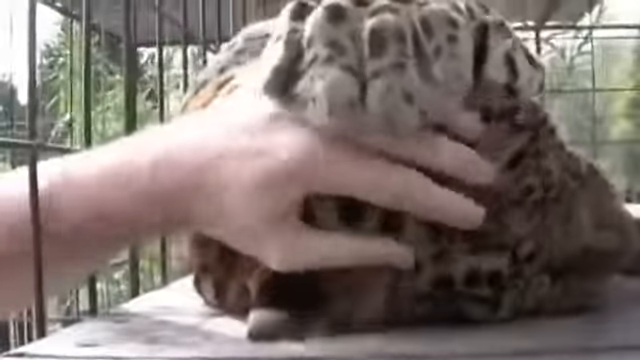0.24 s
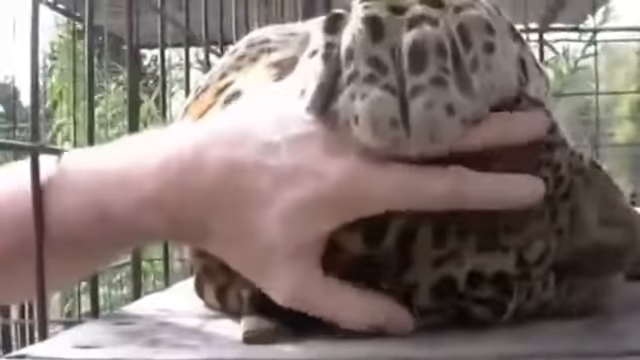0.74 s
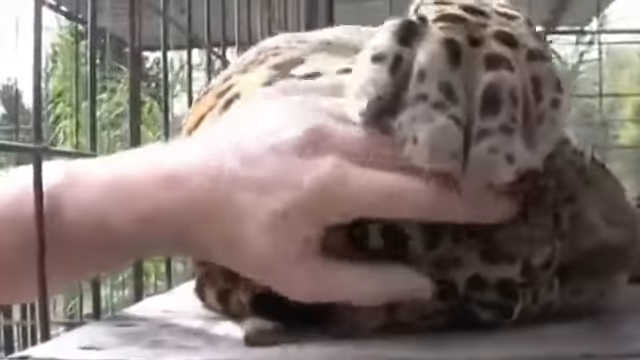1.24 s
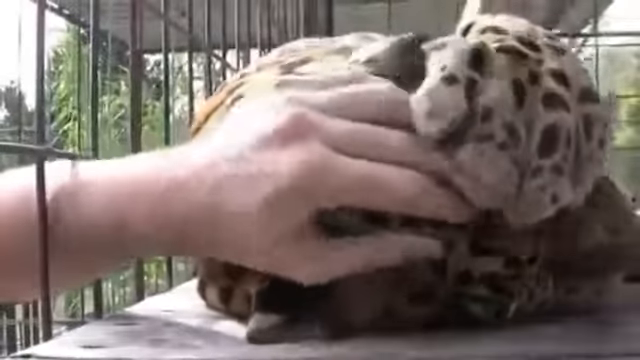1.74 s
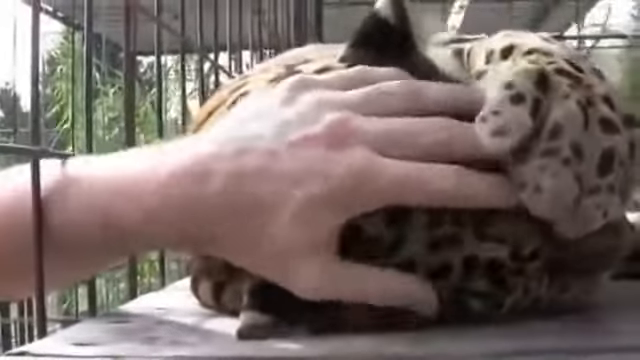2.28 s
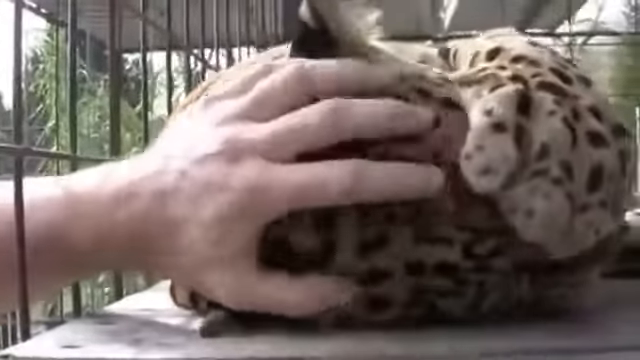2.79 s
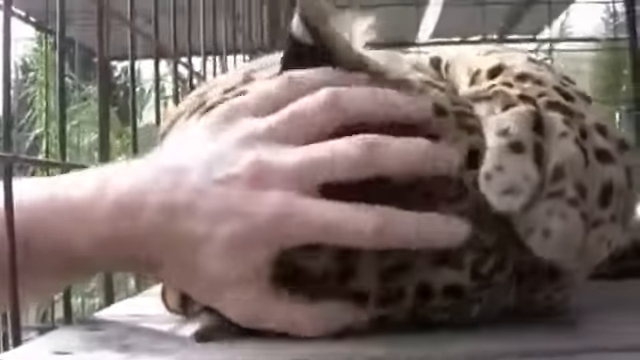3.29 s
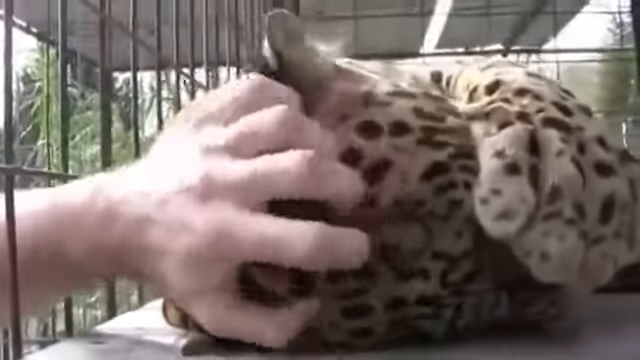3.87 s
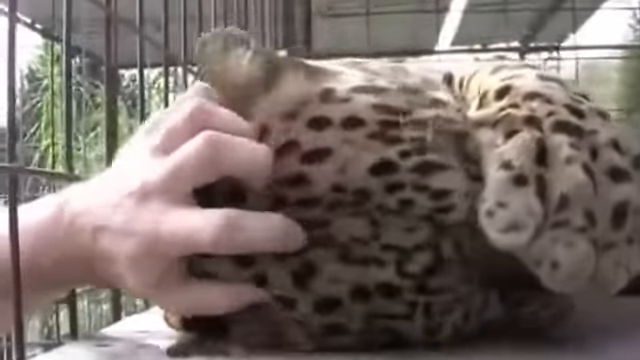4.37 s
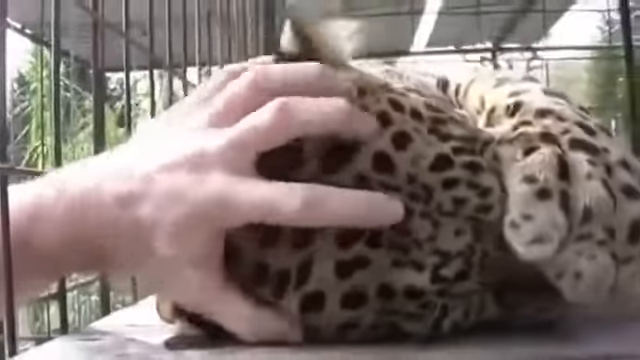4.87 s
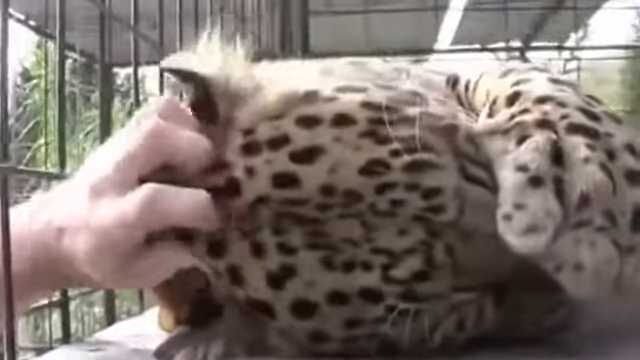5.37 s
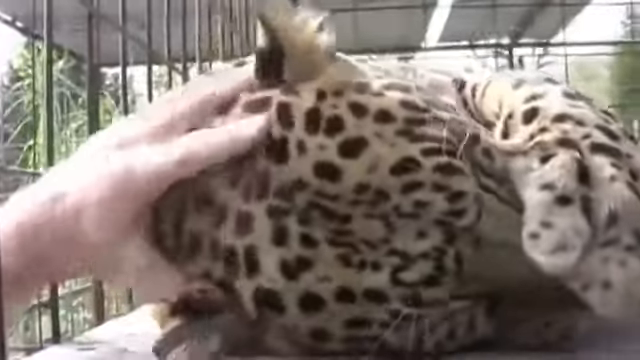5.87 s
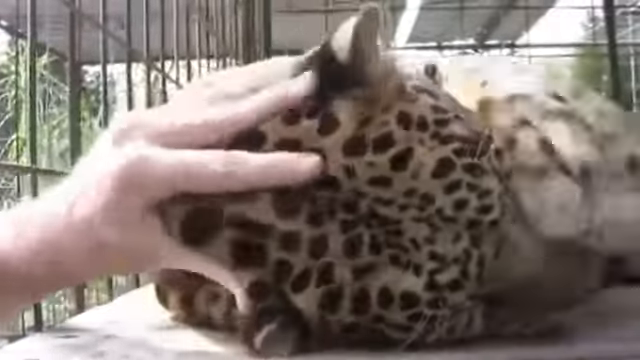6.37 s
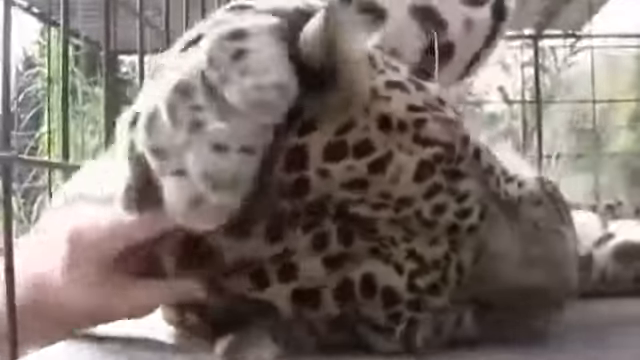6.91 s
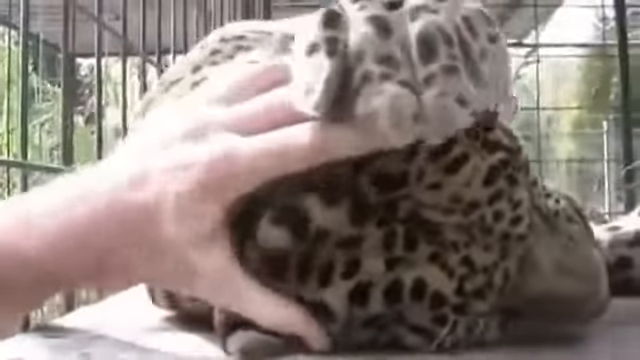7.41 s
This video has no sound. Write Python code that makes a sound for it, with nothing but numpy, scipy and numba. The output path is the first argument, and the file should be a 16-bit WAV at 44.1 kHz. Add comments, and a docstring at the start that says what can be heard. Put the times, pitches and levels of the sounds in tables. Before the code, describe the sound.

One long, loud, rumbling big-cat growl fills the whole stretch, dry and close, with only a short diffuse tail from an outdoor cage. Separate throat pulses are audible like a slow motor. It dulls after the first second, grows fuller from the middle, then becomes irregular and raspier. Faint hand-on-fur rustle, two tiny ticks, wind buffets and constant hiss sit behind, with clipped peaks.

```python
"""From start to end a big cat growls on one long breath, close to a stereo microphone, in an outdoor cage.
Its vocal folds slap shut about thirty times a second and rebound once, ringing throat and mouth.
The input hisses throughout and a breeze rumbles; from half a second to 4.3 s fingers rustle in fur.
Gusts brush the microphone ports between 0.5 and 2.6 s, and small ticks fall at 0.5 and 3.3 s.
After 5.3 s the folds limp in short spells. Loud peaks overload the input."""
import sys
import numpy as np
from scipy import signal
from scipy.fft import rfft, irfft
from scipy.io import wavfile
from scipy.ndimage import uniform_filter1d
from numba import njit

SR = 44100
rng = np.random.default_rng(int(sys.argv[2]) if len(sys.argv) > 2 else 0)


def gain_from_decibels(decibels):
    """Convert decibel values to linear amplitude factors."""
    exponent = np.asarray(decibels, float) / 20
    return 10 ** exponent


def transcribe(signal):
    """Save signal, clipped to [-1, 1], as a 16-bit WAV file at the path in sys.argv[1]."""
    frames = np.atleast_2d(signal).T
    limited = np.clip(frames, -1, 1)
    pcm = np.round(limited * 32767).astype(np.int16)
    wavfile.write(sys.argv[1], SR, pcm)


N = 337365  # length [samples]


def curves(table):
    """Draw straight lines between table rows: one sample-rate curve for each column after the time."""
    s, *columns = np.transpose(table)
    return [np.interp(np.arange(N) / SR, s, c) for c in columns]


def spells(table, edge_s):
    """Sum of plateaus (start [s], length [s], height) with sloping edges."""
    t = np.arange(N) / SR
    total = np.zeros(N)
    for start, length, height in table:
        inside = np.minimum(t - start, start + length - t)
        total += height * np.clip(inside / edge_s + .5, 0, 1)
    return total


def between(ends, control):
    """Straight law from ends[0] at control 0 to ends[1] at control 1, and on beyond."""
    return ends[0] + (ends[1] - ends[0]) * control


def unit(x):
    """Scale to rms 1."""
    return x / np.sqrt(np.mean(x ** 2))


def noise(points):
    """Noise shaped by (frequency [Hz], level [dB]) points; 0 dB is white noise of rms 1."""
    hz, db = np.transpose(points)
    f = np.fft.rfftfreq(N, 1 / SR) + 1
    gain = gain_from_decibels(np.interp(np.log(f), np.log(hz), db))
    return irfft(rfft(rng.standard_normal(N)) * gain, N)


def clicks(s, size):
    """Clicks at times s [s], each shared between two samples to land between them."""
    at = np.clip(s * SR, 0, N + 1)
    i = at.astype(int)
    first = np.bincount(i, size * (1 - at + i), N + 3)
    second = np.bincount(i + 1, size * (at - i), N + 3)
    return (first + second)[:N]


def soften(x, ms):
    """A closure takes a moment, so its click becomes a short bump."""
    bump = np.hanning(int(ms * SR / 1000) + 3)
    return np.convolve(x, bump / bump.sum(), "same")


@njit
def ring(x, pole):
    """One complex resonator whose pole may move: it turns and shrinks a little at every sample."""
    y, z = np.empty(len(x)), 0j
    for i in range(len(x)):
        z = z * pole[i] + x[i]
        y[i] = z.imag
    return y


def mode(x, hz, width, count=1):
    """A damped sine for every click; pitch and width [Hz] may move, and count resonators run in a row."""
    pole = np.exp(np.pi * (2j * hz - width) / SR)
    for _ in range(count):
        x = ring(x, pole)
    return x


# colour of the hiss shared by both sides, before its gain: (frequency [Hz], level [dB])
HISS_MIDDLE = [(30, 16.5), (100, 16), (300, 21), (1000, 5), (1600, -2), (2500, -2.5), (5000, -3.5),
               (8000, -6), (10300, -8.5)]
# colour of the hiss that is opposite left and right, before its gain: (frequency [Hz], level [dB])
HISS_OPPOSITE = [(30, -6), (100, -11.5), (300, -22.5), (1000, -7.5), (2500, -21), (5000, -14), (8000, -10),
                 (10300, -9)]
# fingers rustle in fur: (start [s], length [s], level over the hiss [dB])
FUR_RUSTLES = [(.51, .07, 3), (1.7, 0.23, 1), (2.15, .4, 2.5), (3.6, 0.24, 3), (4.1, .2, 2.5)]


def hiss_and_rustle(side):
    """Steady coloured input noise; fingers in fur swell it, and it flickers slightly throughout."""
    hiss_gain_db = -29
    flicker_db = .55 * unit(uniform_filter1d(rng.standard_normal(N), int(.02 * SR)))
    gain = gain_from_decibels(hiss_gain_db + spells(FUR_RUSTLES, .06) + flicker_db)
    return gain * (noise(HISS_MIDDLE) + side * noise(HISS_OPPOSITE))


# gusts on the microphone ports: (start [s], length [s], level over the breeze [dB])
PORT_GUSTS = [(.58, .14, 11), (.84, 0.14, 8), (1.68, 0.31, 19.5), (2.4, .12, 21)]


def wind():
    """Fluttering low rumble, pushing the two ports partly in opposite ways."""
    breeze_db, opposed = -39.5, .9
    shape = [(20, -2), (60, 17), (110, 12), (180, 16), (400, -33.0), (2000, -45)]  # (Hz, relative dB)
    left = noise(shape)
    right = noise(shape) - opposed * left
    flutter_db = 4.3 * unit(uniform_filter1d(rng.standard_normal(N), int(0.0077 * SR)))
    rumble = unit(gain_from_decibels(flutter_db) * np.array([left, right]))
    return gain_from_decibels(breeze_db + spells(PORT_GUSTS, 0.13)) * rumble


# small ticks of claw or wire: (time [s], click level [dB], pitch [Hz])
CLAW_TICKS = [(0.5342, -15, 3270), (3.3003, -20, 5030)]


def ticks():
    """Each tick is one click that rings a quickly dying sine, equal on both sides."""
    total = np.zeros(N)
    for s, db, hz in CLAW_TICKS:
        click = clicks(np.array([s]), gain_from_decibels(np.array([db])))
        total += mode(click, np.full(N, 1. * hz), 550.0)
    return total


def cage(x, t60, db):
    """Board, roof and wire send back a short diffuse tail, unlike left and right; t60 [s] to fall 60 dB."""
    t = np.arange(int(.25 * SR)) / SR
    tail = rng.standard_normal((2, len(t))) * 1000 ** (-t / t60) * (t > .004)
    tail = tail / np.sqrt(np.sum(tail ** 2, 1, keepdims=True))
    return gain_from_decibels(db) * signal.fftconvolve(x[None], tail, axes=1)[:, :N]


# how often the folds close: (time [s], rate [Hz])
CLOSURE_RATE = [(0.0, 29.614), (0.48, 30.356), (0.96, 29.836), (1.08, 30.79), (1.56, 30.587),
                (2.04, 29.443), (3.0, 30.538), (3.6, 30.725), (3.72, 31.499), (3.96, 30.612),
                (4.44, 31.508), (4.68, 29.999), (4.92, 31.626), (5.16, 30.379), (5.52, 32.589),
                (6.0, 31.092), (6.12, 31.947), (6.36, 30.051), (6.48, 33.997), (6.96, 35.667),
                (7.08, 30.905), (7.65, 33.008)]
# limping, even closures shifted one way and odd ones the other: (start [s], length [s], shift [cycles])
LIMPING = [(5.3, .5, -.03), (5.82, .38, .04), (6.22, .12, -.025), (6.7, .24, .065), (7.35, .3, -.025)]
# voice, also used by throat and mouth:
# (time [s], throat pitch [Hz], rebound share of the slap [0-1], slap level [dB])
VOICE_PATH = [(0.0, 258, 0.67, 0.5), (.3, 286, 0.4, 0), (.75, 279.4, 0.49, 1), (1.05, 271, 0.81, -1.1),
              (1.65, 269.8, 0.64, -1), (2.4, 258.5, 0.64, -2.5), (2.7, 263.2, 0.68, 0.5),
              (3.45, 265, 0.43, 0.7), (4.2, 245.7, 0.58, 0.5), (4.65, 230.4, 0.48, -0.5),
              (5.0, 247, 1, -2.1), (5.2, 249, .55, -1), (5.3, 239, 0.01, -1), (5.9, 261, 0.07, 0.6),
              (6.35, 243, 0.05, -3), (6.43, 239, 0, -1.5), (6.5, 244, 0.49, .5), (6.58, 262, 0.78, 1.7),
              (6.67, 234, .63, -1), (6.72, 242, 0, 1.5), (6.85, 221, 0.63, 2.5), (6.94, 213, 0, -2.5),
              (7.02, 227, 0.5, 4.5), (7.1, 235, 0.7, -5.5), (7.3, 232, 0.74, -1.5), (7.37, 232, 0.14, 1),
              (7.65, 268.4, 0.08, 1)]
# the folds slacken, so the rebound tends to come later; the throat uses the push:
# (time [s], lag after the slap [ms], sharpness [dB], push on the throat [dB])
REBOUND_PATH = [(0, 6.3, -1, 0.5), (.3, 6.33, -1.5, 1.5), (.72, 6.47, -2, 3), (.9, 7.3, 8.5, -7),
                (1.2, 7.26, 8.5, 2.5), (1.5, 8.17, 7, -4), (2.4, 7.74, 7.5, -2), (2.7, 7.3, 3, -1.5),
                (3.1, 7.9, 9.5, -4.5), (3.5, 8.32, 14.5, -1.5), (4.6, 9.07, 11.5, -0.5),
                (4.95, 8.7, 7.5, 1), (5.25, 9.3, 3.5, -6.5), (6.5, 8.8, 11, 2), (6.7, 9.4, -0.5, -2.5),
                (7.02, 8.73, -4.5, 1), (7.15, 9.6, 4.5, 4), (7.35, 9.25, 3, 0)]


def folds():
    """Vocal folds slap shut and rebound once: clicks of both for the throat, brighter ones for the mouth."""
    phase = np.cumsum(curves(CLOSURE_RATE)[0]) / SR
    count, first_cycle = 245, .197
    k = np.arange(count)
    wobble, slap_luck, lag_luck, back_luck, bright_luck, sharp_luck = rng.standard_normal((6, count))
    at = np.interp(k + first_cycle, phase, np.arange(N), right=N - 1).astype(int)
    limp = spells(LIMPING, 0.027)[at]
    _, share, slap_db = (c[at] for c in curves(VOICE_PATH))
    lag_ms, sharp_db, _ = (c[at] for c in curves(REBOUND_PATH))
    # limping folds also keep worse time
    cycle = k + first_cycle + limp * (-1.) ** k + (.0025 + .35 * np.abs(limp)) * wobble
    slap_s = np.interp(cycle, phase, np.arange(N) / SR, right=N)
    slap = gain_from_decibels(slap_db + .5 * slap_luck)
    back_s = slap_s + (lag_ms + .07 * lag_luck) / 1000
    back = slap * np.clip(share + 0.06 * back_luck, 0, None)
    bright_slaps = clicks(slap_s, gain_from_decibels(1.2 * bright_luck))
    bright_rebounds = clicks(back_s, share * gain_from_decibels(sharp_db + 1.2 * sharp_luck))
    return clicks(slap_s, slap), clicks(back_s, back), bright_slaps + bright_rebounds


# throat rings, widths before damping: (multiple of throat pitch, width [Hz], level [dB], sign)
THROAT_RINGS = [(.92, 86, 6.4, -1), (1.105, 105, 4.7, 1)]
# mouth opening, also used by the mouth: (time [s], opening [0 shut, 1 open, more is wider])
MOUTH_OPENING = [(0, 1.53), (.3, 0.54), (1.1, 0.023), (2.0, 0.017), (2.6, 0.16), (3.0, 0.62), (4.0, 0.93),
                 (5.1, 1.09), (5.4, 0.81), (6.4, 0.84), (6.55, 1.32), (6.8, 0.85), (7.1, 0.82), (7.35, 1),
                 (7.65, 0.98)]
# the long throat ring: (time [s], level [dB])
LONG_THROAT_RING = [(0, -6), (.8, -40.5), (2.0, -22.5), (2.6, -12.5), (3.0, -14), (4.0, -34), (5.4, -51),
                    (6.4, -32), (6.55, -20.5), (6.8, -32), (7.1, -9), (7.35, -16)]


def throat_sound(slaps, rebounds):
    """Each slap and rebound rings the air in throat and chest; an open mouth damps the slap's ring more."""
    hz, opening = curves(VOICE_PATH)[0], curves(MOUTH_OPENING)[0]
    slap, back = soften(slaps, .6), soften(rebounds, .9)
    # the rebound moves little air, so it has no deep thud
    no_thud = signal.butter(1, 100., "high", fs=SR, output="sos")
    back = gain_from_decibels(curves(REBOUND_PATH)[2]) * signal.sosfilt(no_thud, back)
    push = slap + back
    damping = between((0.67, 0.99), opening)
    throat = np.zeros(N)
    for ratio, width, db, sign in THROAT_RINGS:
        slap_ring = mode(slap, ratio * hz, damping * width)
        # after the rebound the throat rings with its own steady damping
        back_ring = mode(back, ratio * hz, 1.016 * width)
        throat += sign * gain_from_decibels(db) * (slap_ring + back_ring)
    throat -= gain_from_decibels(curves(LONG_THROAT_RING)[0]) * mode(push, 0.93 * hz, 18.0)
    throat += gain_from_decibels(between((-15.5, -3.5), opening)) * mode(push, 1.46 * hz, 96.0)
    chest_hz, chest_width_hz, chest_db = 127., 72, -19.5
    throat -= gain_from_decibels(chest_db) * mode(slap, np.full(N, chest_hz), chest_width_hz)
    # pressure builds for a few ms before the folds snap shut
    lead = int(.002 * SR)
    early = np.r_[slaps[lead:], np.zeros(lead)]
    build = np.convolve(early, np.linspace(0, 1, int(.0023 * SR)) ** 2)[:N]
    return throat + .2 * soften(build, .5)


# mouth rings: (time [s], second pitch [Hz], second level [dB], third pitch [Hz], third level [dB])
MOUTH_PATH = [(0.0, 1053, -22, 1696, -25), (.3, 1188, -22.5, 1820, -29.5), (.6, 1137, -20.5, 1840, -28.5),
              (.9, 1240, -31, 1780, -39.5), (1.4, 1160, -30, 1814, -38), (1.8, 1163, -31, 1935, -45),
              (2.4, 1162, -31.5, 2040, -53), (2.65, 1073, -25.5, 2140, -41),
              (2.8, 1005, -27.5, 2110, -42.5), (3.3, 1016, -28.5, 2050, -43.5),
              (4.5, 954, -32.5, 1960, -44.5), (5.2, 950, -31, 1944, -40.5), (5.4, 953, -22, 1984, -40.5),
              (6.1, 979, -23.5, 1890, -34.5), (6.44, 940, -29.5, 1890, -43), (6.58, 873, -34.5, 1804, -31),
              (6.74, 925, -25.5, 1760, -35.5), (6.95, 1040, -49.5, 1890, -37),
              (7.3, 1000, -46, 1840, -37.5), (7.5, 1020, -22, 1730, -28.5), (7.65, 1030, -24.5, 1720, -30)]
# (width [Hz]), in turn for nose, second, palate, third and lip ring
MOUTH_WIDTHS = [243, 192, 130., 190, 171]
# brief widenings of the jaws: (start [s], length [s], lift of the second ring [dB])
JAW_GAPES = [(3.5, 0.26, 3), (4.1, 0.44, 4.5), (4.85, 0.52, 5), (7.1, 0.11, 7)]
# the lips draw back: (start [s], length [s], level over the resting lip ring [dB])
DRAWN_LIPS = [(.1, 0.42, 10.5), (6.49, 0.24, 24), (7.1, 0.4, 13)]


def mouth_sound(bright):
    """Sharp closures and puffs of breath ring the linked hollows of nose, mouth, palate and lips."""
    share, opening = curves(VOICE_PATH)[1], curves(MOUTH_OPENING)[0]
    # each closure squeezes out a short turbulent puff
    fade = np.exp(-np.arange(600) / (.003 * SR))
    puff = np.convolve(bright, fade)[:N] * rng.standard_normal(N)
    drive = soften(bright + .025 * puff, .35)
    second_hz, second_db, third_hz, third_db = curves(MOUTH_PATH)
    # wider jaws raise and strengthen the second ring
    gape_db = spells(JAW_GAPES, .12)
    second_hz = second_hz + 23.5 * gape_db  # Hz for each dB
    second_db = second_db + gape_db
    nose_db, drawn_db = between((-35, -32), opening), spells(DRAWN_LIPS, 0.082)
    lip_db = -53.5 + drawn_db
    still = np.ones(N)
    pitches = [745 * still, second_hz, 1310 * still, third_hz, 2415 * still]
    levels = [nose_db, second_db, second_db - 15.5, third_db, lip_db]
    # coupled cavities: each ring swells in softly and leaves hollow gaps between them
    rings = np.zeros(N)
    for hz, width, db in zip(pitches, MOUTH_WIDTHS, levels):
        rings += gain_from_decibels(db) * unit(mode(drive, hz, width, count=2))
    # a broad crack, weaker with more rebound and stronger with drawn lips
    snap_db = between((-31.5, -46), share) + 0.63 * drawn_db
    return rings - gain_from_decibels(snap_db) * unit(mode(drive, 800. * still, 1200.))


def growl():
    """One train of fold closures drives both the throat and the mouth of the cat."""
    slaps, rebounds, bright = folds()
    return throat_sound(slaps, rebounds), mouth_sound(bright)


def scene():
    """The chest side of the cat faces the left port, so the throat leans left."""
    side = np.array([[1.], [-1.]])  # left, right
    background = hiss_and_rustle(side) + wind() + ticks()
    throat, mouth = growl()
    voice = throat * gain_from_decibels(1.2 + 1.7 * side) + mouth * gain_from_decibels(-.1 * side)
    echoes = cage(throat, .2, -16.5) + cage(mouth, 0.11, -16)
    return background + voice + echoes


def roll_off(x):
    """The treble ends steeply here."""
    return signal.sosfilt(signal.butter(12, 10350, fs=SR, output="sos"), x)


def record(dry):
    """The microphone drops the deepest bass, the input overloads with a short knee, the top is cut steeply."""
    bass_cut = signal.butter(2, 45., "high", fs=SR, output="sos")
    near = signal.sosfilt(bass_cut, dry) - .005  # small constant offset
    ceiling, knee = 1.02, 12  # a higher knee bends more abruptly
    squeezed = near / (1 + np.abs(near / ceiling) ** knee) ** (1 / knee)
    top_cut = signal.ellip(10, .2, 60, 10300, fs=SR, output="sos")
    mix = np.clip(signal.sosfilt(top_cut, squeezed), -1, 1)
    return roll_off(mix)


dry = scene()
out = record(dry)
transcribe(out)
```